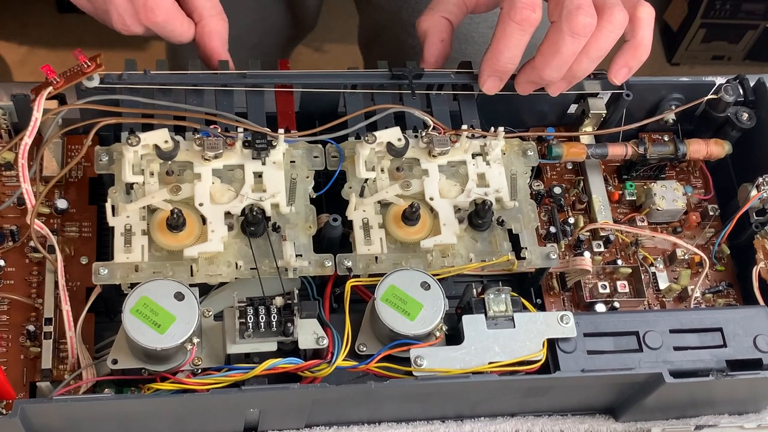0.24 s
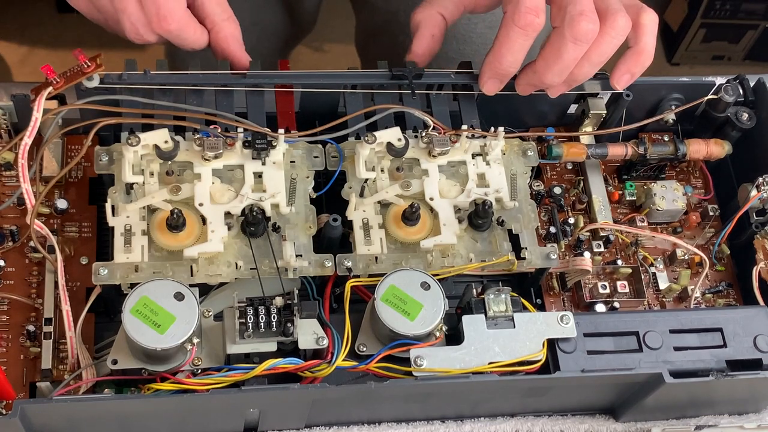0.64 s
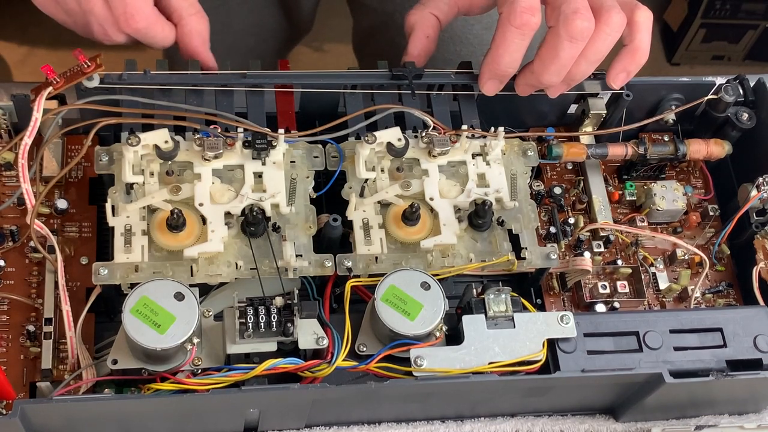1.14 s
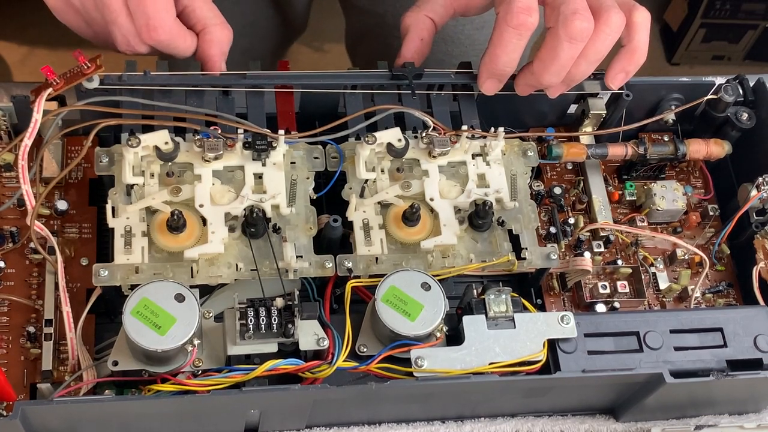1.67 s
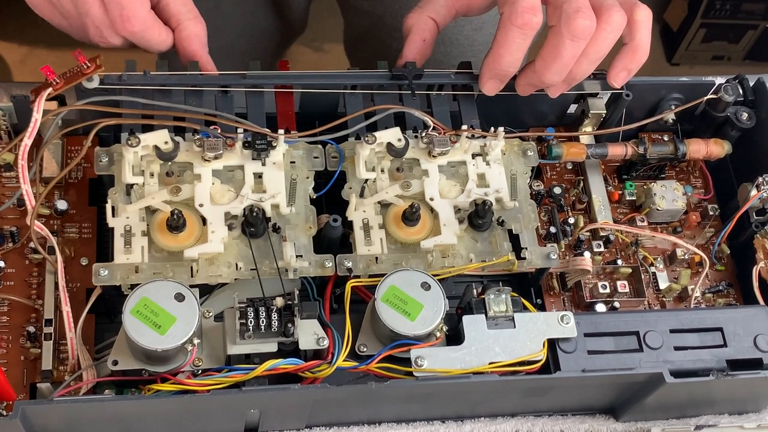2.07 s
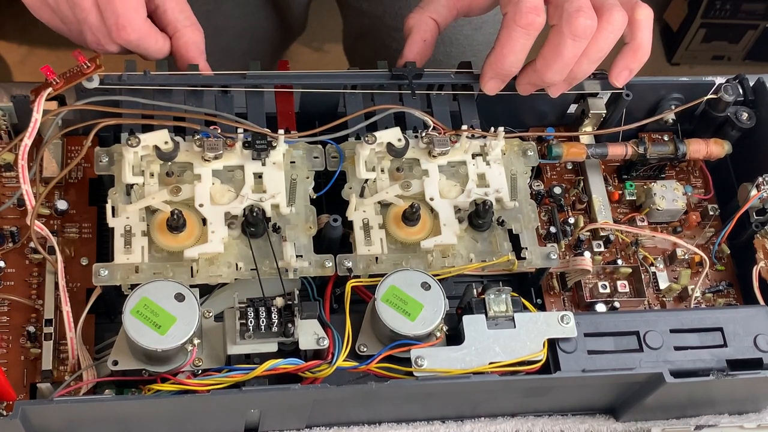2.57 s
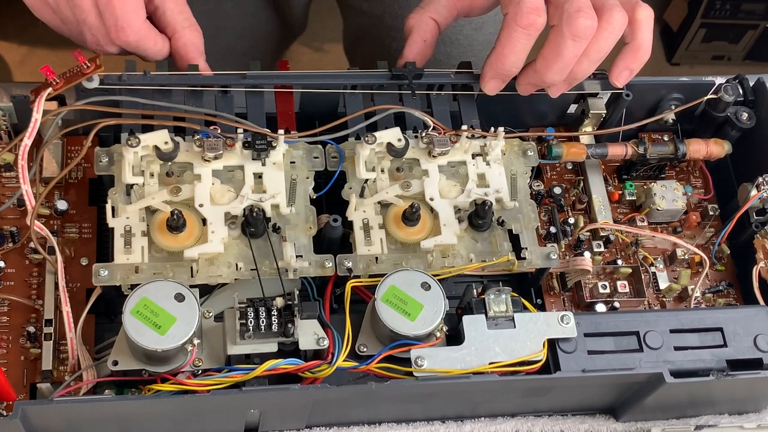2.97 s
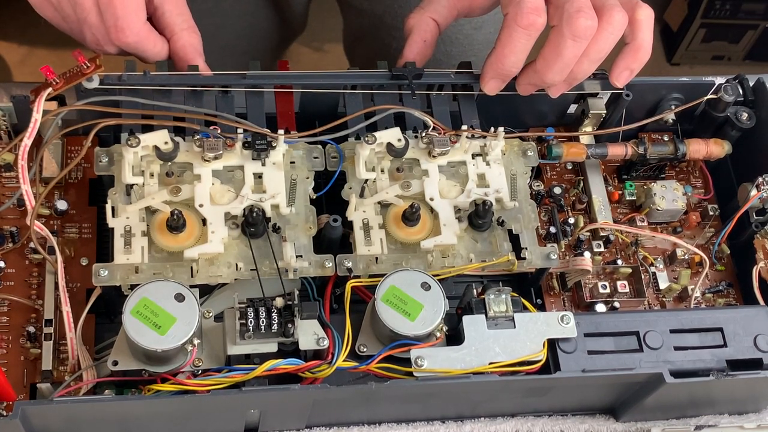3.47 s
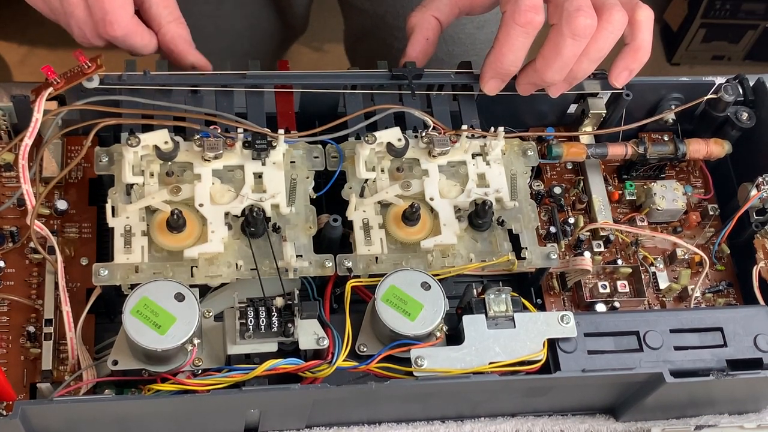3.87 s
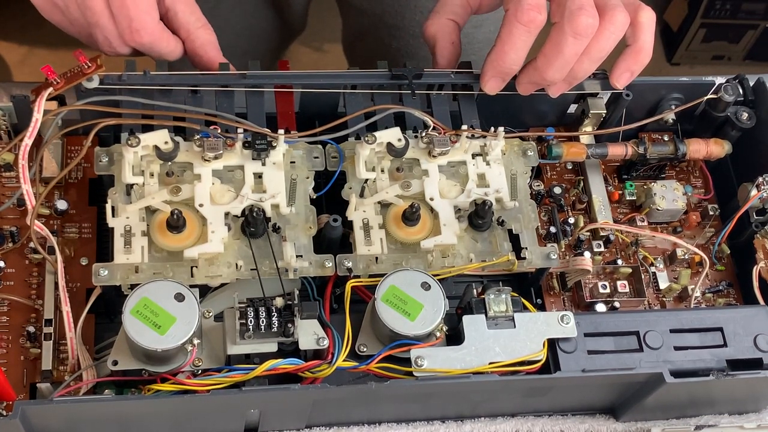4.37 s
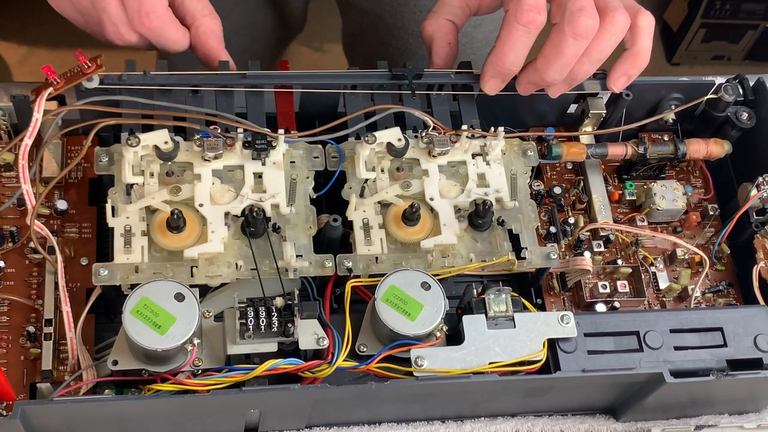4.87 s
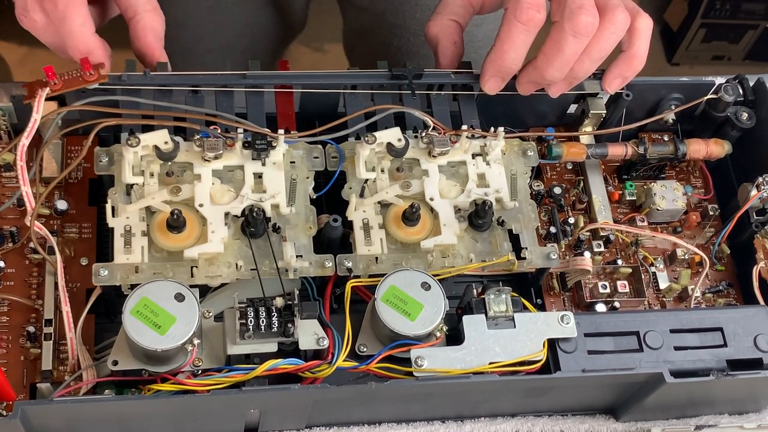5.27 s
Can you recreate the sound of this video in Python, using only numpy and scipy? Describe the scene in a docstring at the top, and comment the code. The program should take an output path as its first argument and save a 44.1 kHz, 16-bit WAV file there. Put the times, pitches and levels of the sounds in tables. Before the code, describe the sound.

A cassette deck whines faintly as fingers tap its keys; one latches, the whine throbs, then two loud spring snaps follow.

```python
"""Cassette deck keys on a workbench

An open twin cassette deck runs up close in a small dry room, its motor whining over a steady whir.
Fingers tap and rub the piano keys. One key latches and loads the drive, so the whine swells and throbs.
Two loud spring snaps follow, each ringing the chassis and thumping the case on the bench."""
import sys
import numpy as np
from scipy import signal
from scipy.fft import rfft, irfft, next_fast_len
from scipy.io import wavfile
from scipy.ndimage import map_coordinates

SR = 44100
rng = np.random.default_rng(int(sys.argv[2]) if len(sys.argv) > 2 else 0)


def transcribe(u):
    """Save the signal u as a 16-bit wav file named by the first command-line argument.

    u: samples, shape (n,) or (channels, n), limited to [-1, 1]; the rate is SR.
    q: integer samples, one column per channel.
    """
    v = np.clip(np.atleast_2d(u).T, -1, 1)
    q = np.round(v * 32767).astype(np.int16)
    wavfile.write(sys.argv[1], SR, q)


N = 243211

# Levers hitting their stops. Each row: start in seconds, then snap, clack, chassis ring and knock
# levels in dB before each layer's trim, then lever pitch in Hz.
SNAPS = [(1.414, -50, -66, -70, -62, 1130), (1.4279, -39, -58.5, -68, -62, 1130),
         (1.496, -41.5, -61, -65.5, -61, 1426), (1.5499, -40, -44, -54, -54, 1616),
         (1.5549, -46, -47.5, -44, -50, 1097), (1.576, -12.5, -34, -33, -33, 1104),
         (1.5825, -29.5, -42.5, -36.5, -30.5, 808), (3.581, -0.5, -17, -17, -10.5, 1398),
         (3.5842, -15, -19.5, -16, -14, 1036), (3.5926, -17, -24, -24.5, -29, 903),
         (3.617, -15, -29.5, -29.5, -38, 1001), (5.239, -55, -64.5, -68, -62, 1300),
         (5.3182, -21.5, -41, -38, -47.5, 1460), (5.3257, -3.5, -23.5, -20.5, -8, 1590),
         (5.3354, -20.5, -28.5, -26, -24, 1090), (5.3402, -39.5, -31, -26.5, -21.5, 1580),
         (5.4016, -48, -47, -49, -59, 1090), (5.4864, -42.5, -51, -52.5, -53, 1610)]
# Fingers on loose keys. Each row: start in seconds, knock and tick in dB before trim, key pitch in Hz.
TAPS = [(.2795, -47, -49, 940), (.369, -52, -86, 712), (.480, -49.5, -70.5, 820), (.501, -52, -60, 830),
        (.6165, -45.5, -48, 800), (.641, -47, -50.5, 724), (.931, -52, -65, 1073), (1.008, -49, -72, 1042),
        (1.180, -46.5, -58.5, 710), (1.489, -45, -56.5, 1250), (1.5254, -55.5, -62, 893),
        (3.354, -48, -89, 797), (4.464, -55.5, -66.5, 781.3), (4.770, -45.5, -49, 1300),
        (4.804, -45.5, -62, 890)]
# Firm pushes on the case. Each row: start in seconds, relative jolt level in dB, jolt pitch in Hz,
# seconds until it lands, relative landing level in dB.
THUMPS = [(.279, -49.5, 197, .037, -59), (0.479, -65, 200, 0.011, -53), (0.619, -65.5, 200, .034, -47.5),
          (1.42, -58.5, 120, 0.062, -53.5), (1.6, -51, 260.3, 0.043, -44), (3.584, -38, 330, 0.0066, -32.5),
          (5.331, -43, 423, 0.01295, -35)]
# Keys sliding in their guides. Each row: start and length in seconds, level in dB, tilt in dB per octave.
RUBS = [(0.891, 0.17, -70, 2.5), (1.367, 0.15, -62.5, 8), (1.475, .1, -66, 3), (4.37, .21, -60.5, -2.5),
        (4.757, 0.082, -51.5, -1.5)]
# The latched key's uneven load on the drive. Each row: time in seconds, whine boost in dB.
DRIVE_LOAD = [(1.56, 0.5), (1.76, 3.5), (1.86, 9.5), (1.95, 7.5), (2.04, 3), (2.1, 8.5), (2.19, 2.5),
              (2.25, 11), (2.32, 2), (2.38, 10.5), (2.5, 9), (2.59, 2), (2.73, 12), (2.87, 9), (2.92, 6.5),
              (2.98, 10), (3.1, 1), (3.17, 8), (3.22, 4), (3.38, 10), (3.48, 11.5), (3.56, 7.5), (3.64, 2)]
# Motor whine partials. Each row: multiple of the commutator rate, relative level in dB.
WHINE_ORDERS = [(3, -85.5), (5, -71.5), (6, -71), (7, -75.5), (8, -73), (13, -93.5), (14, -96.5),
                (15, -95.5), (18, -99)]
# A fingertip's dull knock. Each row: multiple of the key's pitch, relative level in dB.
FINGERTIP_SPECTRUM = [(.15, -24.5), (.35, -13.5), (.56, -12.5), (.78, -4), (1, 4), (1.35, -8.5),
                      (1.9, -12.5), (2.7, -29.5), (6, -51)]

# Ringing parts. Each row: pitch in Hz, relative level in dB, seconds to die away by 60 dB.
CHASSIS_MODES = [(596, -5, .1), (790, -4, .1), (855, -2, .11), (990, -2, .13), (1040, -1, .12),
                 (1114, -4, .09), (1322, -2, .1), (1470, -1, .07), (1565, 2, .08), (1680, 3, .08),
                 (1862, -2, .09), (2293, -11, .08), (2923, -1, .07), (3165, -4, .055), (3321, -4, .06),
                 (3612, -2, .06), (3740, -3, .05), (4030, -5, .06), (4920, -7, .04), (5790, -8, .035),
                 (6400, -8, .04), (6594, -5, .05), (7070, -6, .045)]  # steel chassis and plastic frame
CASE_MODES = [(58, -4, .45), (81, -3, .38), (104, -5, .16), (117, 2.5, .2), (145, -5, .18), (188, -4, .18),
              (215, -5, .15), (299, -3, .17), (345, -8, .1), (455, -10, .1)]  # case on the bench
GEAR_MODES = [(2770, 0, 0.012), (3000, -2, .012), (3364.5, -7, .02), (3750, -6, 0.029), (4650, -7, .012)]  # ticking gear

# Noise colours. Each row: frequency in Hz, relative level in dB.
SNAP_SPECTRUM = [(3000, -28), (5500, -11.5), (7000, 0.5), (8600, -19), (10150, 4.5), (10900, -2),
                 (11800, 0), (13400, -15), (15300, -2), (16500, -20.5)]  # bright spring snap
CLACK_SPECTRUM = [(150, -33.5), (400, -20), (700, 0.5), (1050, -1.5), (1300, 1.5), (1750, 1.5),
                  (2000, -3.5), (2400, -3), (3100, 2), (4300, -2), (5400, -7.5), (6600, -0.5),
                  (9000, -18.5)]  # plastic frame
TICK_SPECTRUM = [(1000, -12), (2000, 0), (2800, 6.5), (3600, 2.5), (5000, -4.5), (7000, -0.5),
                 (8600, -28.5), (11000, -8), (16000, -29.5)]  # tapped key
SLIDE_SPECTRUM = [(400, -30), (800, 15), (2400, 11.5), (3500, 6.5), (5000, -7), (7000, -2), (8600, -34),
                  (11000, -6), (14000, -17.5), (16000, -14)]  # plastic on plastic
WHIR_SPECTRUM = [(450, -27.5), (690, -6), (850, -12), (1090, -2.5), (1220, -14), (1360, 1.5), (1470, -15),
                 (1600, 4.5), (1720, -7), (1830, -8), (2050, -24), (2500, -39.5), (8000, -44.5)]  # belts and pulleys
DRAG_SPECTRUM = [(450, -26.5), (660, -0.5), (800, -6), (990, 0), (1100, 1), (1300, -21), (2500, -40)]  # drive under load
BRUSH_SPECTRUM = [(2350, -19), (2780, 3.5), (3020, -8), (3150, -6.5), (3450, -13), (3750, -6),
                  (4000, -12.5), (5000, -12.5), (8000, -22)]  # motor brushes
BUMP_SPECTRUM = [(15, -27.5), (45, 2.5), (70, -11.5), (130, -41), (300, -60)]  # soft low bump
ROOM_TONE_SPECTRUM = [(20, -23), (50, 5), (130, -0.5), (300, -8), (480, -16.5), (2000, -20.5), (6000, -32),
                      (11000, -27), (16000, -36)]  # quiet room

# Stereo lean of the keys and case. Each row: frequency in Hz, left minus right in dB.
BALANCE = [(100, -.5), (380, 1.5), (700, 3), (1290, 2), (2380, 0), (4400, -4), (8100, -.5), (15000, 0)]
# Stereo likeness of the noises. Each row: frequency in Hz, left-right correlation.
STEREO_CORRELATION = [(100, 0.65), (300, 0.37), (700, 0.49), (1300, 0.29), (2500, 0.044), (12000, 0.004)]
# The room's tail. Each row: frequency in Hz, seconds to die away by 60 dB.
ROOM_DECAY = [(150, .33), (600, 0.3), (1500, 0.13), (5000, 0.18), (14000, 0.11)]
# Wheels that make the loaded whine throb. Each row: turns per second, relative depth.
THROBS = [(6.4, .2), (19.4, .35)]

COMMUTATOR_HZ, BELT_TURNS_PER_S, WOW_DEPTH = 224.7, 4.15, .003
GEAR_TICKS_PER_S, GEAR_DB = 29, -79
FULL_THROW_DB, SLIP_SWELL_S = -13, .026  # snap rows above this level get a scrape that swells by 60 dB
RATTLE_DELAY_S, LANDING_HZ, TOP_HZ = .006, 114, 16300


def snaps():
    """A sprung lever hits its stop: a hard snap, the frame's clack, a knock and the chassis ringing."""
    out = np.zeros((2, N))
    for start, snap_db, clack_db, ring_db, knock_db, hz in SNAPS:
        add(out, start, amp(snap_db - 8) * burst(SNAP_SPECTRUM, attack=.0015, t60=.019))
        add(out, start, amp(clack_db + 1.5) * burst(CLACK_SPECTRUM, attack=.00082, t60=.075))
        add(out, start, amp(knock_db - 7.5) * lever_knock(hz, rise_s=.0019))
        modes = focus(CHASSIS_MODES, hz, fall_db=-1.9)
        chassis = ring(modes, attack=.001, spread=.77, scatter_db=-.5, size=SR // 5)
        add(out, start, amp(ring_db - 3) * chassis)
    return out


def lever_knock(hz, rise_s):
    """A damped plastic lever swells for a few cycles at one pitch and dies quickly."""
    t = np.arange(SR // 2) / SR
    phase = .4 * rng.standard_normal() * np.array([[1], [-1]])
    envelope = (t / rise_s) ** 2 * np.exp(-2 * t / rise_s)
    return normalize_hit(envelope * np.sin(2 * np.pi * hz * t + phase))


def catch_slips():
    """Before a full throw the catch lets go faster and faster, so its scrape swells into the snap."""
    out = np.zeros((2, N))
    t = np.arange(SR // 20) / SR
    swell = amp(-60 * t[::-1] / SLIP_SWELL_S)
    for start, snap_db, clack_db, *_ in SNAPS:
        scrape = amp(-8.5) * noise(SNAP_SPECTRUM, len(t)) + amp(-2.5) * noise(CLACK_SPECTRUM, len(t))
        if snap_db > FULL_THROW_DB:
            add(out, start - t[-1], amp(clack_db - 1.5) * scrape * swell)
    return out


def taps():
    """A fingertip knocks a key dully; the key rings the frame, ticks and rattles back in its guide."""
    out = np.zeros((2, N))
    for start, knock_db, tick_db, hz in TAPS:
        fingertip = burst([(hz * ratio, db) for ratio, db in FINGERTIP_SPECTRUM], attack=.003, t60=.08)
        modes = focus(CHASSIS_MODES, hz, fall_db=51)
        frame = ring(modes, attack=.001, spread=.5, scatter_db=1.5, size=SR // 5)
        add(out, start, amp(knock_db - 1) * fingertip)
        add(out, start, amp(knock_db - 4.5) * frame)
        add(out, start + .0025, amp(tick_db + .3) * burst(TICK_SPECTRUM, attack=.003, t60=.03))
        add(out, start + RATTLE_DELAY_S, amp(tick_db - 5) * burst(CLACK_SPECTRUM, attack=.004, t60=.06))
    return out


def rubs():
    """Plastic slides on plastic with a grainy hiss that swells and fades."""
    out = np.zeros((2, N))
    for start, length, db, tilt_db in RUBS:
        size = round(length * SR)
        spectrum = [(hz, level + tilt_db * np.log2(hz)) for hz, level in SLIDE_SPECTRUM]
        add(out, start, amp(db) * noise(spectrum, size) * np.hanning(size))
    grain = unit_rms(amp(2.71 * wobble(200)))
    return out * grain


def case_jolts():
    """Each firm push jolts the case; a moment later it lands on its feet with a deeper thump."""
    out = np.zeros((2, N))
    for start, jolt_db, jolt_hz, delay, landing_db in THUMPS:
        add(out, start, amp(jolt_db) * thump(jolt_hz, rise_cycles=.68, thud_db=0))
        add(out, start + delay, amp(landing_db) * thump(LANDING_HZ, rise_cycles=2.4, thud_db=1))
    # the thumps carry almost no bass below about 40 Hz
    return signal.sosfilt(signal.butter(2, 42, "high", fs=SR, output="sos"), out)


def thump(hz, rise_cycles, thud_db):
    """The case rings near one pitch and the bench answers with a rough, centred thud."""
    case = ring(focus(CASE_MODES, hz, fall_db=7), attack=rise_cycles / hz, spread=.22, scatter_db=2.5)
    spectrum = [(hz / 3, -30), (hz, 0), (hz * 2, -14), (hz * 5, -50)]
    thud = normalize_hit(burst(spectrum, attack=.0084, t60=.17).mean(axis=0))
    return amp(6) * case + amp(thud_db) * thud


def motor():
    """Commutator whine over whirring belts; load lifts the third and fifth orders and makes them throb."""
    t = np.arange(N) / SR
    load_db = np.interp(t, *np.transpose(DRIVE_LOAD))
    load_share = load_db / load_db.max()
    wheels = sum(depth * np.cos(2 * np.pi * (rate * t + rng.random())) for rate, depth in THROBS)
    load_gain = amp(load_db) * (1.5 + wheels * load_share)
    wow = WOW_DEPTH * np.sin(2 * np.pi * BELT_TURNS_PER_S * t)
    pitch_hz = COMMUTATOR_HZ * (1 + wow + .001 * wobble(5) + .0045 * wobble(45))
    angle = 2 * np.pi * np.cumsum(pitch_hz) / SR
    whine = np.zeros((2, N))
    for order, db in WHINE_ORDERS:
        gain, flutter_depth, drift_depth = (load_gain, 1.7, .34) if order in (3, 5) else (1, 2.2, .38)
        flutter_db = flutter_depth * (wobble(22) + wobble(75))
        phase = rng.uniform(0, 2 * np.pi) + np.array([[.4], [-.4]])
        drift = drift_depth * (wobble(11) + wobble(60))  # uneven segments make each order wander
        whine += amp(db + flutter_db) * gain * np.sqrt(2) * np.sin(order * angle + phase + drift)
    whir = noise(WHIR_SPECTRUM, N) * amp(-62 + .12 * load_db + .6 * wobble(15))
    drag = noise(DRAG_SPECTRUM, N) * amp(-63.5) * load_share
    # the brushes scrape hardest once per commutator segment
    scrape = unit_rms(1 + .15 * np.cos(angle)) * amp(-79.5 + .3 * load_db + wobble(23))
    return amp(1.5) * whine + whir + drag + scrape * noise(BRUSH_SPECTRUM, N)


def gears():
    """Gear teeth tick faintly and unevenly in their slack."""
    out = np.zeros((2, N))
    count = int(N / SR * GEAR_TICKS_PER_S)
    for tooth, (lag, accent) in enumerate(rng.standard_normal((count, 2))):
        start = abs(tooth + .25 * lag) / GEAR_TICKS_PER_S
        tick = ring(GEAR_MODES, attack=.0005, spread=.8, scatter_db=4, size=SR // 10)
        add(out, start, amp(GEAR_DB + 1.8 * accent) * tick)
    return out


def room_reverb(x, delay_s):
    """The bench and near walls answer with a short tail; the bass lingers longest."""
    hz, t, bands = signal.stft(noise([(100, 0), (16000, 0)], SR // 2), SR, nperseg=256)
    decay = amp(-60 * t / curve_at(ROOM_DECAY, hz)[:, None])
    tail = signal.istft(bands * decay, SR, nperseg=256)[1]
    tail = np.pad(tail / np.linalg.norm(tail[0]), ((0, 0), (round(delay_s * SR), 0)))
    return signal.fftconvolve(x, tail, axes=1)[:, :N]


def low_bump(start, length, db):
    """A soft, very low bump swells and fades."""
    out = np.zeros((2, N))
    size = round(length * SR)
    add(out, start, amp(db) * noise(BUMP_SPECTRUM, size) * np.hanning(size))
    return out


def ring(modes, attack, spread, scatter_db, size=SR // 2):
    """Struck modes at random strength and polarity; spread parts their left and right phases."""
    t = np.arange(size) / SR
    out = np.zeros((2, size))
    for hz, db, t60 in modes:
        phase = np.pi * rng.integers(2) + spread * rng.standard_normal() * np.array([[1], [-1]])
        gain = amp(db + scatter_db * rng.standard_normal())
        out += gain * np.sin(2 * np.pi * hz * t + phase) * fade(t, attack, t60)
    return normalize_hit(out)


def focus(modes, centre_hz, fall_db):
    """Modes lose fall_db per squared octave from the pitch of the blow; a negative fall lifts them."""
    return [(hz, db - fall_db * np.log2(hz / centre_hz) ** 2, t60) for hz, db, t60 in modes]


def burst(spectrum, attack, t60):
    """A noise hit, like countless damped resonances struck together."""
    t = np.arange(SR // 2) / SR
    return normalize_hit(noise(spectrum, len(t)) * fade(t, attack, t60))


def noise(spectrum, size):
    """Coloured stereo noise of rms 1, narrower in the bass and wide in the treble."""
    def mid_side_gains(hz):
        width = np.arccos(np.clip(curve_at(STEREO_CORRELATION, hz), -1, 1)) / 2
        return amp(curve_at(spectrum, hz)) * [np.cos(width), np.sin(width)]

    mid, side = filtered(rng.standard_normal((2, size)), mid_side_gains)
    return unit_rms(np.array([mid + side, mid - side]))


def fade(t, attack, t60):
    """A rise and an exponential decay, both timed in seconds."""
    return (1 - np.exp(-t / attack)) * 10 ** (-3 * t / t60)


def wobble(rate):
    """A smooth random curve with rate knots a second."""
    return map_coordinates(rng.standard_normal(int(N * rate / SR) + 4), [np.arange(N) * rate / SR])


def filtered(x, response):
    """Equalize x with a gain that depends on frequency."""
    size = x.shape[-1]
    padded = next_fast_len(size + 8192)
    return irfft(rfft(x, padded) * response(np.fft.rfftfreq(padded, 1 / SR)), padded)[..., :size]


def curve_at(points, hz):
    """Read (Hz, value) points on a log frequency axis."""
    freqs, values = np.transpose(points)
    return np.interp(np.log(hz + 1), np.log(freqs + 1), values)


def amp(db):
    """Decibels to gain."""
    return 10 ** (np.asarray(db) / 20)


def unit_rms(x):
    """Scale x to rms 1."""
    return x / np.sqrt(np.mean(x ** 2) + 1e-20)


def normalize_hit(x):
    """Give a hit the energy of 4 ms at rms 1."""
    return unit_rms(x) * np.sqrt(.004 * SR / x.shape[-1])


def add(track, start, sound):
    """Mix a sound into the track at start seconds."""
    part = track[:, round(start * SR):][:, :sound.shape[1]]
    part += sound[:, :part.shape[1]]


def scene():
    """Keys over motor and room tone; the chassis throws its mids left and its lower treble right."""
    keys = snaps() + catch_slips() + taps() + rubs()
    deck = keys + amp(-9.5) * room_reverb(keys, delay_s=.0044) + case_jolts()
    lean_left = np.array([[.5], [-.5]])
    deck = filtered(deck, lambda hz: amp(curve_at(BALANCE, hz) * lean_left))
    background = amp(-68) * noise(ROOM_TONE_SPECTRUM, N) + low_bump(2.71, length=.31, db=-58)
    drive = (motor() + gears()) * amp(lean_left)
    return deck + drive + background


def record(dry):
    """Clip the peaks at full scale, then cut the top treble steeply."""
    return filtered(np.clip(dry, -1, 1), lambda hz: 1 / (1 + (hz / TOP_HZ) ** 160))


dry = scene()
out = record(dry)
transcribe(out)
```